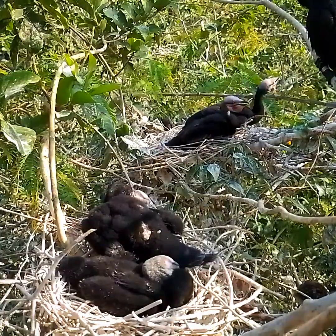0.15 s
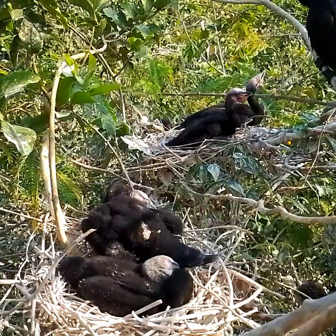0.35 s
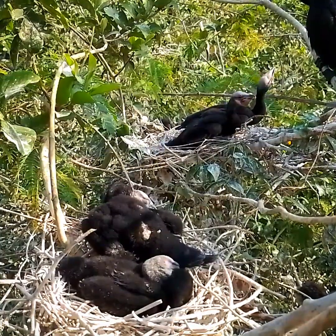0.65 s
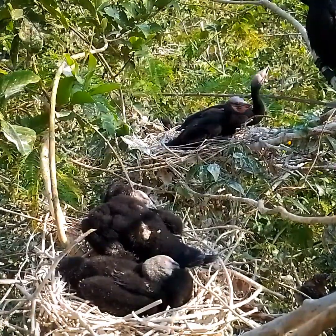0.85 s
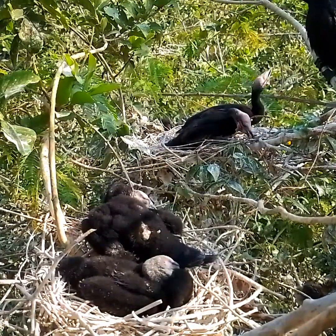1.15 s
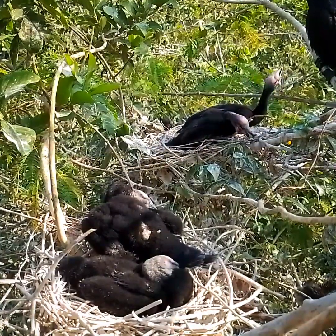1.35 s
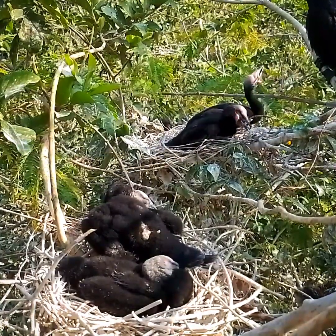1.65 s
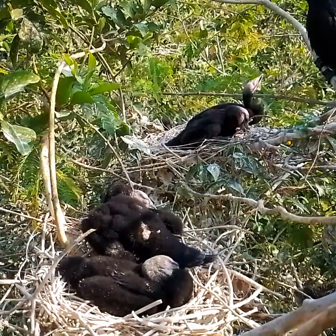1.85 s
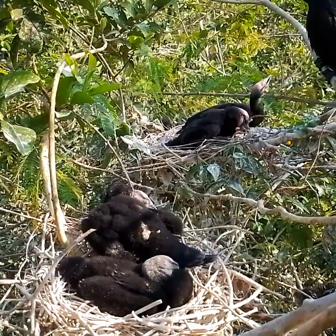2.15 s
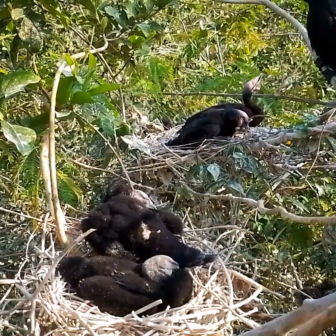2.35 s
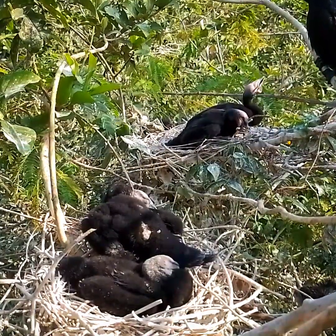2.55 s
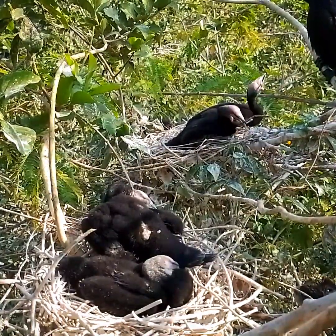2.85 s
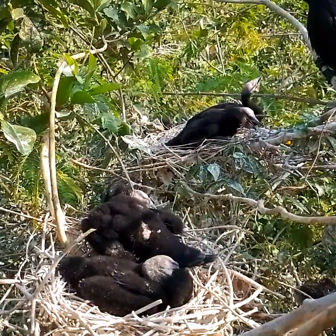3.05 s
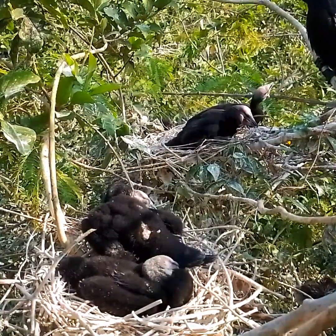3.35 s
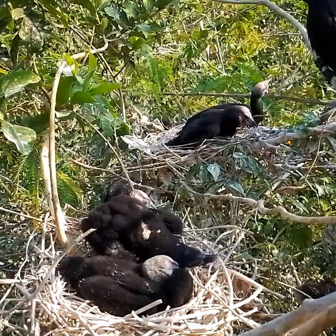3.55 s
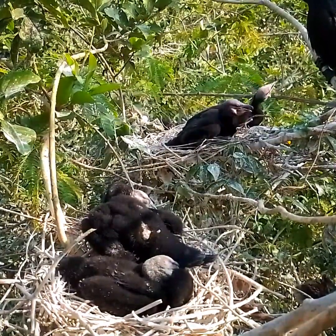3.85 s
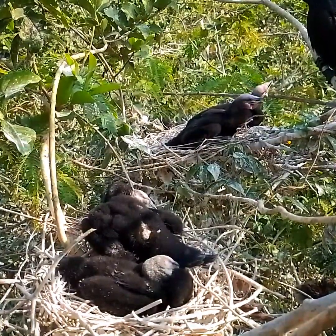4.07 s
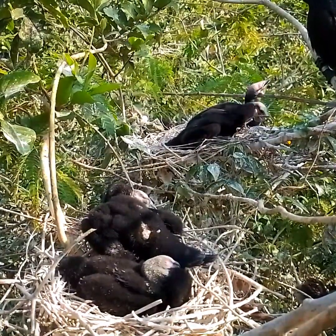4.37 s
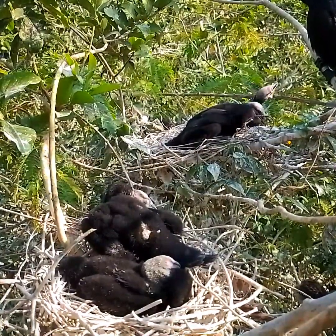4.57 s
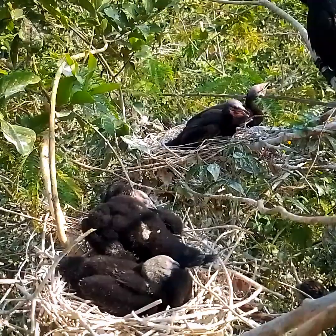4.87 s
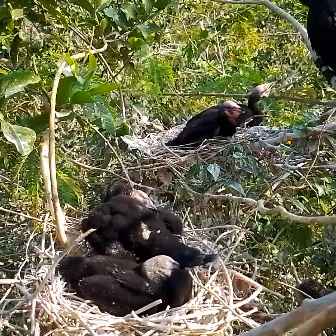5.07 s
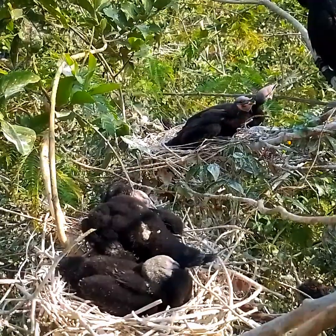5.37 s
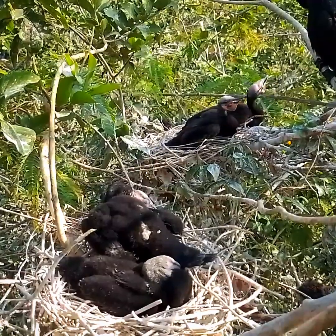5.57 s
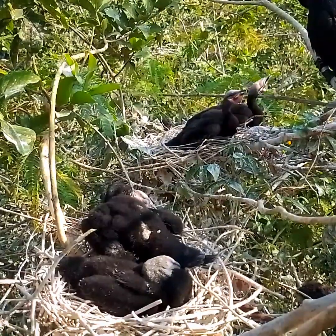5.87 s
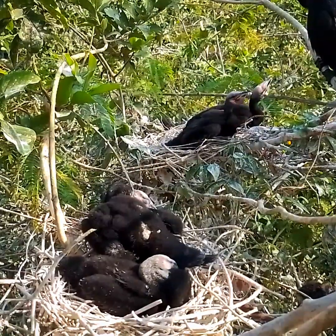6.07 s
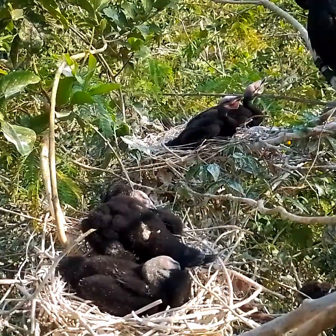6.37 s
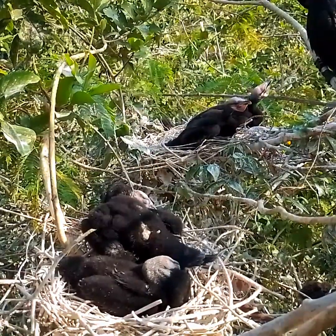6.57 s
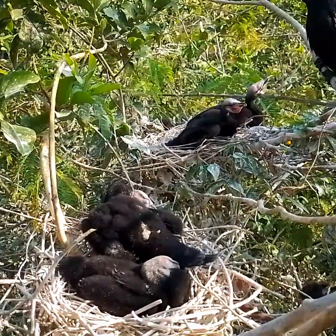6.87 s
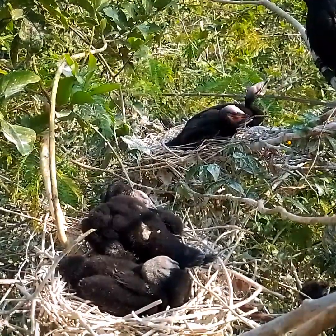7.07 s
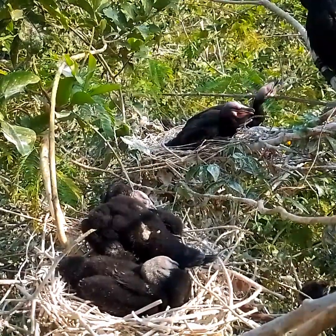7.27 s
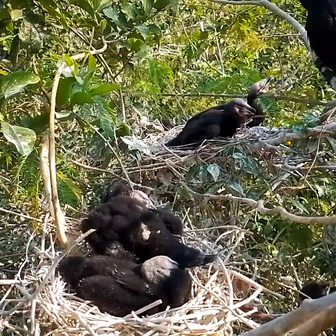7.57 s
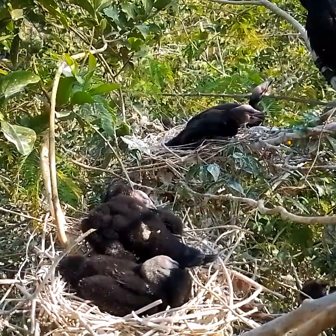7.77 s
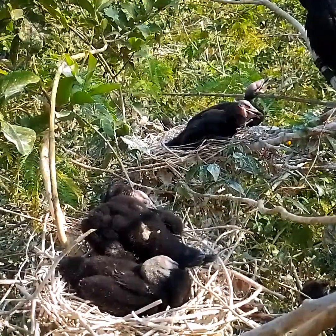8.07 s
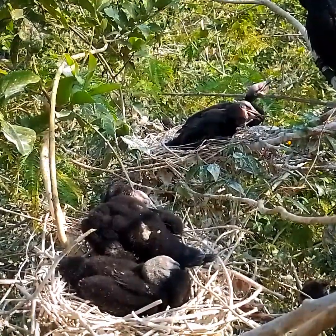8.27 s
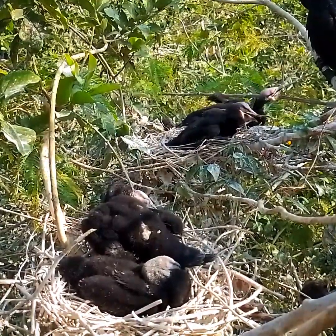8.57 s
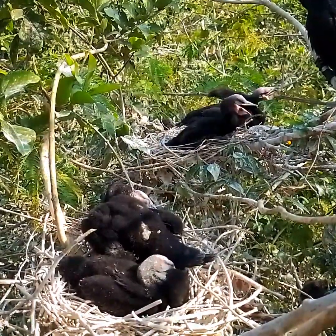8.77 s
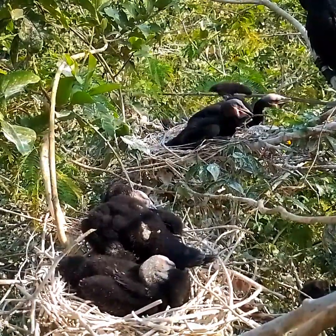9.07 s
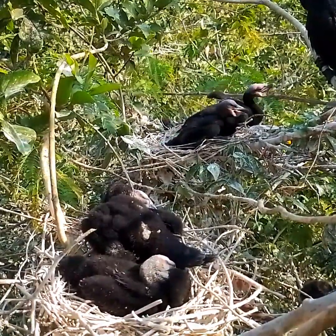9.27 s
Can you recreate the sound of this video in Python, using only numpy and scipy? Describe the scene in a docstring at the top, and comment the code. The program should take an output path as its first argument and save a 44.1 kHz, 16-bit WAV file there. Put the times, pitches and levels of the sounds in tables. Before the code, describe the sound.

Dense, bright bird din around twig nests. A close young bird repeats gritty chaks, louder up to about two seconds, while shriller chicks answer from other sides. After a lull and another weaker run, the chaks thin out and rough squeals that glide up and drop take over, each stirring up the neighbours. Faint adult hoots, thin wavering cries and barely audible twig knocks sit behind. Small stereo microphone, open air, short leafy reverberation.

```python
"""Cormorant colony in leafy trees

Close by, chicks beg with short rasping chaks (pulse bursts through a throat filter) and long hoarse
squeals (a rasp gathering into gliding partials). An adult gives low arched hoots; farther off, nests
chatter, cluck and cry thinly, twigs knock and the wood washes softly. Foliage scatters the calls back
to a small stereo microphone with ringing ports."""
import sys
import numpy as np
from scipy import signal
from scipy.fft import rfft, irfft, next_fast_len
from scipy.io import wavfile
from scipy.ndimage import map_coordinates

SR = 44100
rng = np.random.default_rng(int(sys.argv[2]) if len(sys.argv) > 2 else 0)


def store_pcm(level_fs):
    """Save levels as 16-bit WAV."""
    pcm = np.round(np.clip(level_fs, -1, 1) * 32767).astype(np.int16)
    wavfile.write(sys.argv[1], SR, np.atleast_2d(pcm).T)


N = 415422

# short begging calls of each close chick: start_s, relative level_db, shrillness (share of a wide gape),
# nasality (share of a tight throat, negative for a loose one)
CHAK_CALLS = {"near": [(0.0, -35.0, 0.5, 0.0), (0.191, -30.0, 0.1, 0.1), (0.389, -28.0, 0.1, -0.1),
              (0.497, -42.0, 0.2, -0.1), (0.599, -28.5, -0.3, 0.1), (0.803, -26.5, -0.2, 0.3),
              (0.928, -45.0, 0.0, -0.1), (1.003, -25.5, -0.4, 0.3), (1.217, -27.0, -0.3, 0.2),
              (1.868, -30.0, 0.2, 0.1), (2.071, -23.5, -0.2, 0.4), (2.27, -22.5, -0.2, 0.6),
              (3.328, -38.0, 0.4, 0.1), (3.557, -33.0, 0.5, 0.2), (3.767, -31.5, 0.3, 0.2),
              (3.992, -32.5, 0.0, -0.2), (4.232, -31.0, 0.2, -0.2), (5.706, -46.0, 0.1, -0.6),
              (5.86, -47.5, 0.4, -0.5), (5.895, -47.0, 0.0, -0.4), (7.94, -45.5, -0.1, -0.3),
              (9.223, -37.0, 0.0, -0.3)], "shrill": [(0.022, -36.0, 1.0, -0.3), (0.239, -36.5, 1.1, -0.1),
              (0.452, -38.5, 1.1, -0.1), (0.661, -38.5, 1.1, 0.0), (1.096, -40.0, 0.8, 0.0),
              (1.313, -40.0, 0.6, -0.2), (1.53, -47.0, 1.3, 0.2), (1.755, -42.0, 0.8, 0.2),
              (1.977, -42.5, 1.1, 0.4), (2.18, -40.0, 1.0, 0.2), (2.393, -39.5, 0.7, 0.0),
              (2.612, -43.5, 1.0, 0.3), (3.252, -45.0, 0.9, 0.3), (3.471, -44.5, 0.9, 0.5),
              (3.68, -44.5, 0.9, 0.1), (3.888, -49.0, 1.0, 0.1), (4.094, -40.0, 1.1, 0.4),
              (4.304, -40.0, 0.8, 0.3), (4.626, -50.5, 0.5, -0.1), (4.681, -48.5, 1.0, 0.1),
              (4.725, -44.0, 0.8, 0.2), (4.888, -45.5, 1.1, 0.1), (5.112, -38.0, 1.1, -0.2),
              (5.339, -38.0, 0.9, -0.2), (5.553, -43.5, 1.2, 0.0), (5.672, -40.0, 0.9, -0.1),
              (5.802, -46.0, 1.1, 0.0), (6.027, -53.0, 1.2, 0.0), (6.49, -53.5, 0.9, -0.1),
              (7.381, -37.5, 1.0, -0.3), (8.099, -45.0, 0.8, -0.4), (8.161, -52.0, 1.1, 0.3),
              (8.194, -41.5, 0.9, 0.0), (8.415, -43.5, 1.1, -0.1), (8.596, -41.0, 0.5, -0.5),
              (9.12, -44.0, 0.8, -0.6)], "left": [(0.85, -42.0, 0.4, 0.3), (1.054, -39.0, 0.1, 0.6),
              (1.25, -36.5, -0.2, 0.2), (1.425, -44.5, 0.5, 0.4), (1.562, -42.5, 0.8, 0.8),
              (1.639, -43.5, 0.6, 1.2), (1.84, -40.0, 0.3, 0.3), (2.026, -41.5, 0.3, 1.3),
              (2.208, -36.5, 0.3, 1.3), (3.21, -48.0, 0.2, 0.7), (3.28, -45.0, 0.6, 0.4),
              (3.391, -38.0, 0.3, 1.0), (3.592, -40.0, 0.3, 1.0), (3.715, -39.0, 0.3, 0.5),
              (3.805, -42.0, 0.2, 0.4), (4.025, -38.5, 0.4, 0.0), (4.127, -41.5, -0.1, 0.3),
              (4.325, -40.5, 0.5, 0.7), (4.512, -39.5, 0.1, 1.1), (6.342, -51.0, 0.5, 0.3),
              (8.618, -43.0, 0.4, 0.2), (8.8, -48.5, 0.7, 0.3), (8.977, -44.0, 0.5, 0.7),
              (9.152, -39.5, 0.4, 0.3)], "ahead": [(3.031, -38.0, 0.6, -0.2), (3.071, -40.0, 0.6, 0.0),
              (3.119, -38.0, 0.5, 0.1), (4.797, -47.5, 0.3, -0.1), (5.06, -44.0, 0.7, -0.2),
              (6.51, -44.0, 0.8, 0.2), (6.543, -41.5, 0.8, 0.0), (6.798, -39.0, 0.6, 0.0),
              (6.852, -39.5, 0.6, 0.3), (7.503, -38.0, 0.5, -0.4), (7.604, -41.0, 0.6, -0.1),
              (8.0, -36.5, 0.6, 0.2), (9.345, -37.5, 0.5, 0.2)], "right": [(2.72, -50.5, 0.1, 0.5),
              (2.885, -42.5, 0.3, 0.1), (2.945, -43.0, 0.1, 0.0), (6.927, -42.0, -0.2, -0.3),
              (6.98, -40.0, 0.2, -0.1), (7.114, -39.5, 0.2, -0.2)]}
# the close chicks: length_s, attack_s, pulse_note_db, left_right_db, lead_at_left_port_s
CHICK_PLACES = {"near": (.026, .0014, -13, 6, .00032), "shrill": (.024, .0018, -12, 1.5, -.00021),
                "left": (.044, .008, -26, 9, .00032), "ahead": (.027, .003, -12, 0, -.00033),
                "right": (.045, .006, -12, -3, -.00034)}
# long begging calls: start_s, end_s, share_before_peak, opening_hz, peak_hz, final_hz, hoarseness (0-1),
# whistle level_db, second_partial_ratio, second_partial_db, higher_partials_db, rasp_db, left_right_db;
# both levels are relative to their curves below
SQUEAL_CALLS = [(.8, .96, .66, 3500, 3580, 3400, .95, -50, 2, 0, -3, -58, 0),
                (1.68, 1.9, .66, 3500, 3600, 3470, 1, -55, 2, 6, 8, -48, -3),
                (2.3, 2.43, .45, 2800, 2850, 2200, .95, -36.5, 2.1, -5, -11, -45, 0),
                (2.8, 3.17, .66, 3200, 3450, 3010, .94, -47, 2, -8, -5, -48, -9),
                (4.32, 4.5, .74, 2850, 2950, 2550, .33, -38, 2, 0, -12, -37.5, 2),
                (4.84, 5.07, .6, 2500, 2650, 2300, .72, -42.5, 2.27, 3, -5, -47, -1),
                (6.085, 6.31, .62, 3200, 3050, 2650, .8, -49, 2.04, 15, -3, -52, 0),
                (6.57, 6.84, .55, 2750, 3350, 3000, .9, -41.5, 2, 9, -3, -35, -1),
                (7.115, 7.355, .72, 2550, 3400, 2400, .8, -40.5, 2.04, 2, -1, -35.5, 0),
                (7.72, 7.93, .66, 2900, 3480, 1850, .8, -39, 2.06, 4, 2, -34, 0),
                (8.22, 8.41, .76, 3300, 3550, 3100, .6, -50, 2.03, 13, 13, -42, 2),
                (8.69, 8.99, .7, 2650, 2520, 2250, .85, -45, 2, 2, 1, -41, 3),
                (9.27, 9.48, .5, 2660, 2620, 2400, .25, -52, 2, 16, 6, -47, 3)]
# whistle level at the start, peak and end of a squeal: level_db
WHISTLE_SWELL = (-7, 4, .5)
# rasp level at the start, peak and end of a squeal: level_db
RASP_SWELL = (-4.5, -2.5, -28)
# the adult's hoots: start_s, end_s, top_hz, relative level_db
HOOT_CALLS = [(5.61, 5.68, 365, -62), (6.207, 6.287, 460, -55), (6.592, 6.67, 640, -50),
              (6.725, 6.775, 420, -62), (7.025, 7.122, 600, -53), (7.677, 7.748, 540, -59),
              (8.07, 8.148, 610, -55), (8.425, 8.512, 615, -55.5), (9.07, 9.15, 430, -58)]
# thin cries from other nests: start_s, end_s, opening_hz, final_hz, waver (share of pitch), level_db
NEST_CRIES = [(2.28, 2.345, 1400, 1080, 0.1, -40), (2.46, 2.497, 5900, 5820, 0.006, -50),
              (5.095, 5.45, 3225, 3200, 0.045, -52), (5.5, 5.78, 3230, 3100, 0.05, -51),
              (6.122, 6.53, 1738, 1700, 0.05, -63), (6.7, 7.15, 1383, 1330, 0.04, -61),
              (7.44, 7.699, 3300, 3150, .08, -48), (8.401, 8.597, 2924, 2950, 0.04, -52)]
# loudness of the rest of the colony: time_s, relative level_db
COLONY_LEVEL = [(.12, -50), (.32, -45), (.98, -50), (1.15, -46), (2.15, -46), (2.52, -50), (2.7, -46),
                (3.5, -48), (3.87, -46), (4.65, -50), (5.72, -45), (6.0, -59), (6.2, -51), (6.46, -58),
                (6.56, -46), (7.45, -47), (8.55, -47), (9.42, -48)]
# knocks on nest twigs: start_s, relative level_db
TWIG_KNOCKS = [(2.587, -60), (5.273, -61.5), (7.505, -62.5), (7.523, -62)]
# a chick's throat, bill half shut: frequency_hz, gain_db
CHICK_THROAT = [(300, -40.5), (700, -24), (1000, -24), (1400, -22), (1700, -23), (2050, -12), (2450, -12.5),
                (2950, 2.5), (3500, -3.5), (4050, -4), (4650, -8), (5400, -4.5), (6050, -3), (7200, -8.5),
                (8000, -11.5), (8800, -20), (14000, -25)]
# what a wide bill adds: frequency_hz, gain_db
WIDE_BILL = [(3000, -2), (4500, 1.5), (6000, 4.5), (7500, 15.5), (10000, 15), (14000, 12)]
# what a tight throat adds: frequency_hz, gain_db
TIGHT_THROAT = [(2000, 0), (3000, -7), (3600, -4), (4200, 7), (5100, -2), (6500, 5), (7600, -2),
                (10000, -3)]
# a wide-open throat, rasping before the whistle forms: frequency_hz, gain_db
WIDE_THROAT = [(600, -32), (1800, -21), (2500, -3), (3200, 3), (4250, -13), (5150, 3.5), (5800, -4),
               (7500, 2.5), (8900, -8), (10200, -2), (14000, -11)]
# the bill dulls the top of a squeal: frequency_hz, gain_db
BILL_DULLING = [(10800, 0), (12000, -3)]
# colour of distant calls: frequency_hz, gain_db
DISTANCE_COLOUR = [(400, -2), (1200, 5), (2000, 4.5), (3100, -.5), (4700, -1), (7500, .5), (10500, 1.5),
                   (14000, -3)]
# colour of the distant wood: frequency_hz, gain_db
WOOD_AIR = [(20, -8), (90, -10), (160, -23), (260, -7), (420, -6), (650, -5), (1000, -10), (2000, -9.5),
            (6000, -13.5), (14000, -26)]
# decay of the tail among the trees: frequency_hz, t60_s
TREE_DECAY = [(300, 0.43), (3000, 0.17), (12000, 0.31)]
# ringing of the left microphone port: frequency_hz, gain_db
LEFT_RINGING = [(2500, 0), (6000, 1.5), (6800, 4), (7600, 10), (8000, 5.5), (8400, -2), (9500, -3.5),
                (11000, -10), (14000, -10.5)]
# ringing of the right microphone port: frequency_hz, gain_db
RIGHT_RINGING = [(2500, 1.5), (5000, -3), (6000, -4), (7000, -9), (8000, -7.5), (9000, 1.5), (9700, 4),
                 (10400, 13), (11200, 8), (12300, -1), (14000, 0)]

TOP_HZ = 14400  # band limit of the microphone
HOOT_TOP = .53  # share of a hoot spent rising
JOIN_DB, JOIN_S, JOIN_LAG_S = 6, .085, .08  # neighbours join each squeal: rise, half width, delay
RIGHT_LEAD_S = -.00033  # lead at the left port for a bird on the right


def amp(db):
    """Decibels to an amplitude factor."""
    return 10 ** (np.asarray(db) / 20)


def unit(x):
    """x scaled to an rms of 1."""
    return x / np.sqrt(np.mean(x ** 2) + 1e-20)


def along(points, hz):
    """Interpolate (Hz, value) points on a log frequency axis."""
    f, v = np.transpose(points)
    return np.interp(np.log(hz + 1), np.log(f), v)


def wobble(n, rate):
    """A smooth random curve of n samples, rate knots a second."""
    knots = rng.standard_normal(int(n * rate / SR) + 4)
    return map_coordinates(knots, [np.arange(n) * rate / SR], mode="nearest")


def ripple(spacing_hz=260):
    """Random peaks and dips over frequency, as a function of Hz."""
    knots = rng.standard_normal(int(SR / 2 / spacing_hz) + 3)
    return lambda hz: map_coordinates(knots, [hz / spacing_hz], mode="nearest")


def coloured(x, db_at, size=1024):
    """x through the causal (minimum-phase) filter whose gain in dB is db_at(Hz)."""
    cepstrum = irfft(np.log(amp(db_at(np.fft.rfftfreq(size, 1 / SR)))))
    # fold the cepstrum forward in time
    cepstrum[1:size // 2] *= 2
    cepstrum[size // 2 + 1:] = 0
    response = irfft(np.exp(rfft(cepstrum)))
    return signal.fftconvolve(x, response)[:len(x)]


def add(out, call, s, pan_db, lead_s=RIGHT_LEAD_S, path_db=3.5):
    """Place a call: it reaches one port sooner, and twigs colour its path to each port."""
    balance = np.sqrt((amp(pan_db) + amp(-pan_db)) / 2)
    for channel, side in zip(out, (1, -1)):  # left, right
        path = ripple()
        heard = coloured(call, lambda hz: path_db * path(hz) * np.minimum(hz / 2000, 1))
        first = max(0, round((s - side * lead_s / 2) * SR))
        part = channel[first:][:len(call)]
        part += heard[:len(part)] * amp(side * pan_db / 2) / balance


def rasp(pitch, jitter, breath):
    """Uneven syrinx pulses, each followed by a puff of noise."""
    n = len(pitch)
    cycles = np.cumsum(pitch * np.exp(jitter * wobble(n, 700))) / SR
    pulses = np.diff(np.floor(cycles), prepend=-1) * amp(2 * rng.standard_normal(n))
    puffs = rng.standard_normal(n) * np.exp(-2 * (cycles % 1))
    share = np.clip(breath, 0, 1)
    return np.sqrt(1 - share) * unit(pulses) + np.sqrt(share) * unit(puffs)


def chak(length, shrill, nasal, attack=.0022, throat_spread=.07, start_hz=570, end_hz=780,
         release=.0075, colour_db=2, chest_db=-12, opening=.05):
    """A quickening pulse burst; throat resonances rise as the bill opens, a wider bill is shriller."""
    t = np.arange(int((length + .029) * SR)) / SR
    pitch = np.interp(t, [0, length], [start_hz, end_hz]) * (1 + .15 * shrill)
    pitch = pitch * np.exp(.06 * rng.standard_normal())
    swell = (1 - np.exp(-t / attack)) * np.exp(-np.maximum(t - .72 * length, 0) / release)
    # no two calls are alike
    stretch = np.exp(throat_spread * rng.standard_normal())
    own = ripple(614)

    def throat(hz):
        bill = shrill * along(WIDE_BILL, hz) + nasal * along(TIGHT_THROAT, hz)
        return along(CHICK_THROAT, hz * stretch) + bill + colour_db * own(hz)

    # the pulse rate itself, a short rising note
    chest = amp(chest_db) * np.sin(2 * np.pi * np.cumsum(pitch) / SR)
    call = coloured(swell * (rasp(pitch, jitter=.07, breath=.22) + chest), throat)
    # reading ever faster slides the resonances up
    speed = 1 + opening * (np.minimum(t / length, 1) - .5)
    return map_coordinates(call, [np.cumsum(speed)], order=5)


def air(level_db=-71, side_db=-7):
    """The soft, restless wash of the distant wood: coloured noise of wandering level."""
    def wash():
        noise = coloured(rng.standard_normal(N), lambda hz: along(WOOD_AIR, hz))
        return unit(noise) * amp(2.1 * wobble(N, 11))

    mid = wash()
    side = amp(side_db) * wash()
    return amp(level_db) * np.array([mid + side, mid - side])


def clucks(count=80, level_db=-72.5, pitch_hz=750, rise=.18, second_db=-9):
    """From distant nests mostly the low note of a call carries: a bed of soft rising clucks."""
    out = np.zeros((2, N))
    # slot offset, length s, octaves, dB, left-right dB
    draws = rng.uniform([0, .025, -.3, -6, -4], [1, .06, .42, 5, 4], (count, 5))
    for k, (offset, length, octaves, db, pan_db) in enumerate(draws):
        n = int(length * SR)
        glide = 1 + rise * np.linspace(-.5, .5, n) + .08 * wobble(n, 400)
        phase = 2 * np.pi * np.cumsum(pitch_hz * 2 ** octaves * glide) / SR
        note = (np.sin(phase) + amp(second_db) * np.sin(2 * phase)) * np.hanning(n)
        add(out, amp(db) * note, (k + offset) / count * N / SR, pan_db)
    return amp(level_db) * unit(out)


def din_db():
    """The colony's excitement drifts and flares up just after each squeal begins."""
    t = np.arange(N) / SR
    flares = sum(np.exp(-((t - start - JOIN_LAG_S) / JOIN_S) ** 2) for start, *_ in SQUEAL_CALLS)
    return np.interp(t, *np.transpose(COLONY_LEVEL)) + JOIN_DB * flares


def colony(count=280, level_db=-1.5, spread_db=2.5, path_db=5):
    """Farther nests give blurred chaks, many of them longer, from all sides through more leaves."""
    out = np.zeros((2, N))
    # slot offset, length s, shrillness, nasality, side (-1 right to 1 left)
    draws = rng.uniform([0, .02, 0, -.4, -1], [1, .07, .9, .7, 1], (count, 5))
    for k, (offset, length, shrill, nasal, side) in enumerate(draws):
        call = unit(chak(length, shrill, nasal, throat_spread=.09, opening=.14))
        call *= signal.windows.tukey(len(call), .25) * amp(spread_db * rng.standard_normal())
        distant = coloured(call, lambda hz: along(DISTANCE_COLOUR, hz))
        s = (k + offset) / count * N / SR
        add(out, distant, s, 1.5 + 7 * side, -side * RIGHT_LEAD_S, path_db)
    return unit(out) * amp(level_db + din_db())


def knocks(t60=.06, pan_db=2):
    """A bird shifts its weight: the nest gives a dull knock, a decaying burst of coloured noise."""
    out = np.zeros((2, N))
    t = np.arange(SR // 10) / SR
    wood = [(120, -39), (230, 2), (500, -6), (1300, -4.5), (5000, -16.5)]  # (Hz, dB)
    for s, db in TWIG_KNOCKS:
        burst = rng.standard_normal(len(t)) * amp(-60 * t / t60)
        knock = unit(coloured(burst, lambda hz: along(wood, hz)))
        add(out, amp(db) * knock / 2, s, pan_db)
    return out


def cries(pan_db=2):
    """Thin cries from other nests: single tones of wavering pitch and quivering level."""
    out = np.zeros((2, N))
    for start, end, hz, final_hz, waver, db in NEST_CRIES:
        n = int((end - start) * SR)
        pitch = np.linspace(hz, final_hz, n) * (1 + waver * wobble(n, 700))
        phase = 2 * np.pi * np.cumsum(pitch) / SR
        quiver = amp(4 * wobble(n, 140) + 3 * wobble(n, 25))
        cry = unit(np.sin(phase) * quiver) * signal.windows.tukey(n, .4)
        add(out, amp(db) * cry, start, pan_db)
    return out


def hoots(foot_hz=240, pan_db=1, level_db=1):
    """The adult's soft, slightly gruff low note: three partials slide up and down again."""
    out = np.zeros((2, N))
    for start, end, hz, db in HOOT_CALLS:
        t = np.arange(start, end, 1 / SR)
        top = start + HOOT_TOP * (end - start)
        arch = np.sin(np.pi * np.interp(t, [start, top, end], [0, .5, 1]))
        gruff = .07 * wobble(len(t), 500)
        phase = 2 * np.pi * np.cumsum((foot_hz + (hz - foot_hz) * arch) * (1 + gruff)) / SR
        tone = sum(amp(level + 1.9 * wobble(len(t), 143)) * np.sin(k * phase)
                   for k, level in enumerate([-2.5, -7.5, -11], 1))
        add(out, amp(db + level_db) * unit(tone) * np.abs(arch) ** .75, start, pan_db)
    return out


def squeals(level_db=0, halves_db=-9, formant_hz=380, drop_power=2.8, waver=.3, patchy_db=3.5,
            flutter_db=2.2, sputter_db=2.5, wander=.03):
    """A broad rasp swells into a hoarse squeal, then clears and drops as the chick runs out of air."""
    out = np.zeros((2, N))
    for (start, end, share, first_hz, hz, final_hz, hoarse, db,
         ratio, second_db, high_db, rasp_db, pan_db) in SQUEAL_CALLS:
        peak = start + np.clip(share, .1, .9) * (end - start)
        stages = [start, peak, end]
        n = int((end - start) * SR)
        t = start + np.arange(n) / SR
        rough = np.clip(hoarse * np.interp(t, stages, [1.5, .95, .15]), 0, 1)

        # pitch: hold, glide to the peak, drop
        rise = np.interp(t, [(2 * start + peak) / 3, peak], [0, np.pi / 2])
        fall = np.clip((t - peak) / (end - peak), 0, 1)
        glide = first_hz + (hz - first_hz) * np.sin(rise) ** 2 + (final_hz - hz) * fall ** drop_power
        glide = glide * np.exp(wander * np.sqrt(rough) * wobble(n, 60))
        phase = 2 * np.pi * np.cumsum(glide * np.exp(.09 * rough * wobble(n, 1100))) / SR

        # the higher partials mellow during the fall
        partials = [(1, 0), (ratio, second_db), (3, high_db), (4, high_db - 3)]
        mellow_db = -11 * fall ** 2
        tone = sum(amp(level + (k - 1) * mellow_db + 2 * wobble(n, 40))
                   * np.sin(k * phase + waver * (k - 1) * wobble(n, 900)) for k, level in partials)
        # a rough syrinx doubles its period
        tone += rough * amp(halves_db + second_db / 2) * np.sin(phase + phase / 2)

        def pipe(f):
            """Windpipe resonances around the partials."""
            power = sum(amp(level) ** 2 / (1 + ((f - k * hz) / (formant_hz * np.sqrt(k))) ** 2) ** 2.5
                        for k, level in partials)
            return 10 * np.log10(power)

        # the rasp rings in these resonances, which slide along with the whistle
        pulses = rasp(np.full(n, 600), jitter=.2, breath=.35)
        ringing = coloured(pulses, pipe)
        sliding = map_coordinates(ringing, [np.cumsum(glide / hz)], order=5, mode="mirror")
        grit = np.std(tone) * unit(sliding)
        whistle = np.sqrt(1 - rough) * tone + np.sqrt(rough) * grit
        whistle = amp(db + np.interp(t, stages, WHISTLE_SWELL)) * whistle

        own = ripple()  # the throat is held differently in every squeal
        body = coloured(pulses, lambda f: along(WIDE_THROAT, f) + patchy_db * own(f))
        body = amp(rasp_db + np.interp(t, stages, RASP_SWELL)) * unit(body)

        # hoarse parts sputter, clear parts flutter
        sputter = np.sqrt(rough) * sputter_db * wobble(n, 420)
        flutter = np.sqrt(1 - rough) * flutter_db * wobble(n, 250)
        call = (whistle + body) * unit(amp(sputter + flutter)) * signal.windows.tukey(n, .12)
        call = coloured(call, lambda f: along(BILL_DULLING, f))
        add(out, amp(level_db) * call, start, pan_db, path_db=2.2)
    return out


def chaks(level_db=11.7):
    """The nearest chicks beg, each from its own place; bill and throat are set anew for every call."""
    out = np.zeros((2, N))
    for chick, calls in CHAK_CALLS.items():
        length, attack, chest_db, pan_db, lead_s = CHICK_PLACES[chick]
        for s, db, shrill, nasal in calls:
            call = chak(length, shrill, nasal, attack, throat_spread=.02, chest_db=chest_db)
            add(out, amp(db + level_db) * call, s, pan_db, lead_s, path_db=3)
    return out


def foliage(x, near_db=-8.5, far_db=-12, near_t60=.068, onset=.015):
    """Nearby twigs scatter each call at once; the trees return a short tail."""
    hz, t, z = signal.stft(rng.standard_normal((2, SR // 2)), SR, nperseg=256)
    decay = amp(-60 * t / along(TREE_DECAY, hz)[:, None])
    tail = signal.istft(z * decay, SR, nperseg=256)[1]
    t = np.arange(tail.shape[1]) / SR
    twigs = rng.standard_normal(tail.shape) * amp(-60 * t / near_t60)
    tail = tail * (1 - np.exp(-t / onset))
    echo = amp(near_db) * twigs / np.linalg.norm(twigs[0]) + amp(far_db) * tail / np.linalg.norm(tail[0])
    return signal.fftconvolve(x, echo, axes=1)[:, :N]


def scene():
    """All birds and knocks, their scatter in the foliage, and the air of the wood."""
    birds = clucks() + colony() + knocks() + cries() + hoots() + squeals() + chaks()
    return air() + birds + foliage(birds)


def record(dry):
    """Each microphone port rings at its own frequency; nothing passes the band limit."""
    ports = np.array([coloured(x, lambda hz: along(port, hz))
                      for x, port in zip(dry, (LEFT_RINGING, RIGHT_RINGING))])
    m = next_fast_len(N + SR // 2)
    passed = np.fft.rfftfreq(m, 1 / SR) < TOP_HZ
    return irfft(rfft(ports, m) * passed, m)[:, :N]


dry = scene()
out = record(dry)
store_pcm(out)
```